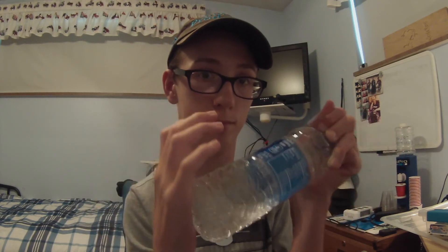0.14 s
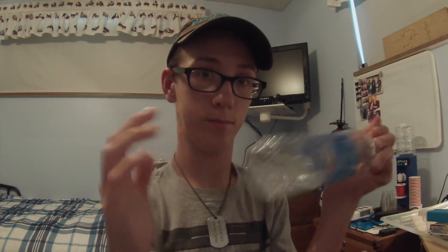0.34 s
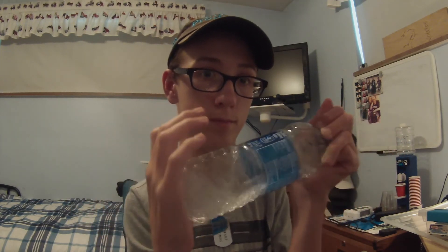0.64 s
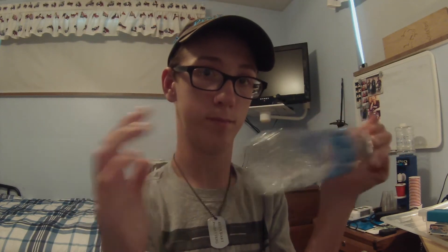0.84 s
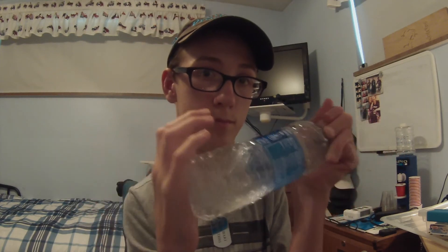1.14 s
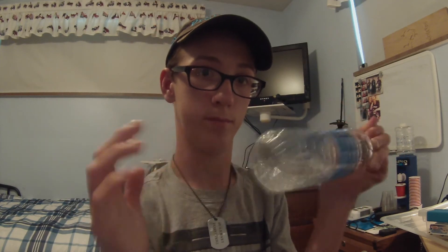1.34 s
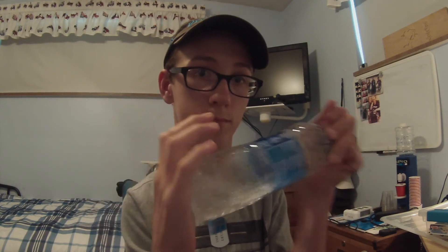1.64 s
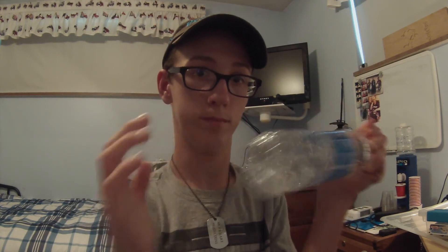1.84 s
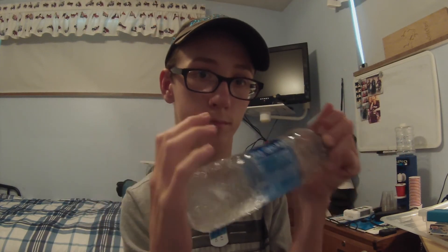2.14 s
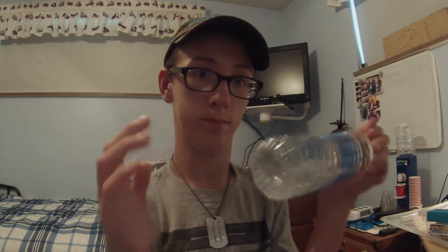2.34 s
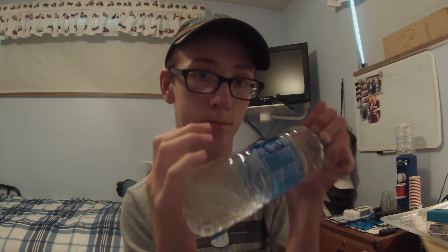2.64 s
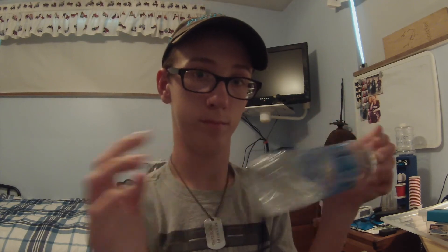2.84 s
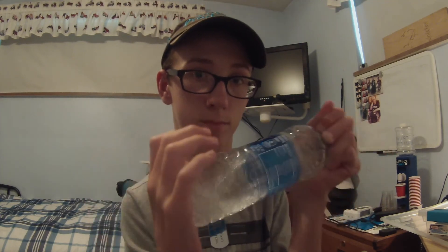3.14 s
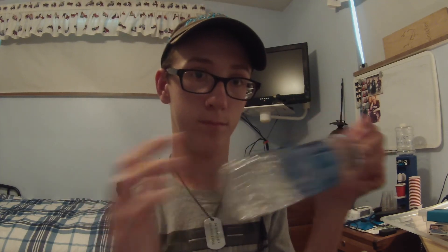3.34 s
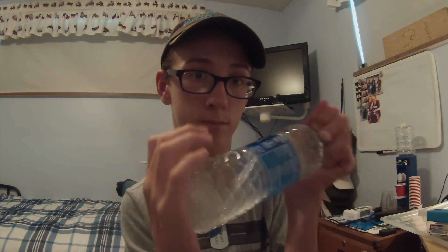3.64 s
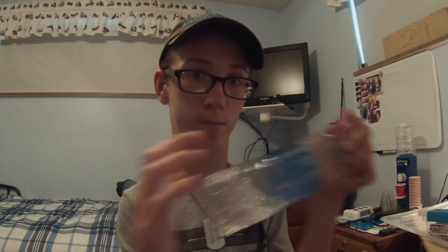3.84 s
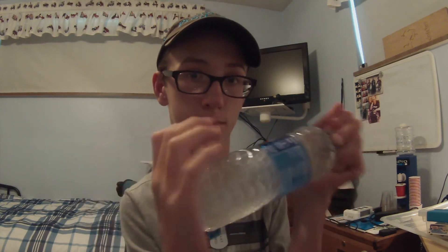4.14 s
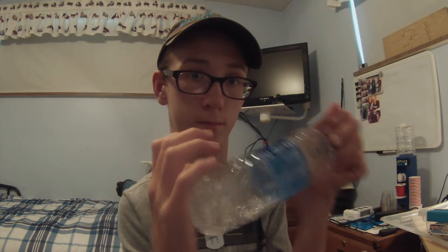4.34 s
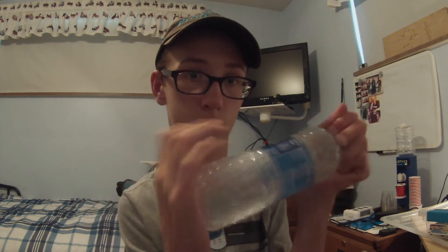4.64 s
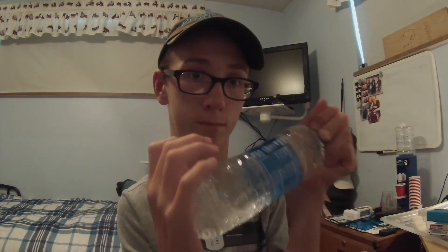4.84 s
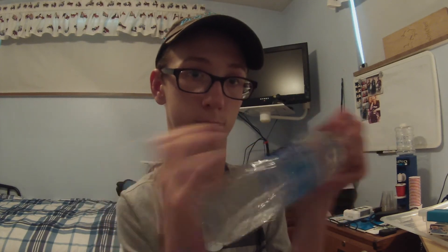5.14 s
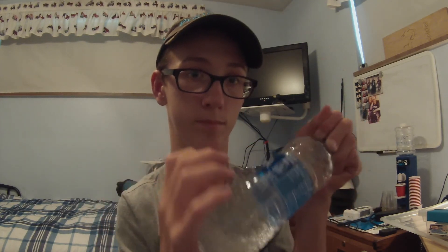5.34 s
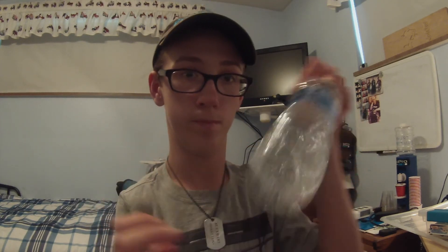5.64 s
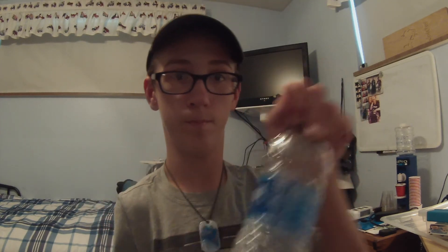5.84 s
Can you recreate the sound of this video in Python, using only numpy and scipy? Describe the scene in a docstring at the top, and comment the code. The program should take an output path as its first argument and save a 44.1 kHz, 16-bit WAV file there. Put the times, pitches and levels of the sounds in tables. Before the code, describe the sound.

A close microphone in a small, briefly echoing room picks up an empty thin plastic bottle squeezed by hand, over quiet air noise and a faint low hum. The sound starts in mid-squeeze at 0 s, then pops come near 0.5, 1.0, 1.5, 2.0, 2.5, 3.0, 3.6, 4.1, 4.7, 5.2 and 5.8 s. Each begins about a tenth of a second early with skidding fingertips and bright crinkling, then a crack and hollow thump with a short ring, then duller rustling as the wall springs back. Brief strained groans slip in just before some pops, around 0.5, 1.5, 3.5, 4.1 and 4.6 s. A particularly sharp crease snaps at 0.64 s, another strong one near 5.18 s. Thumps are fullest around 2.0, 4.1 and 4.7 s; the last squeeze is weaker, longer and crackly, with little thump.

```python
"""Hollow thumps, about two a second, break through the crackle of an empty thin plastic bottle squeezed and let go.
In each squeeze fingertips skid and rub (filtered noise and slips), then a wall panel pops (a crack, a pulse of
air and ringing modes). Grains of wrinkling film and a sliding hiss make the crinkle, duller as the wall springs
back; creases snap as ticks with short rings, and now and then the strained wall groans on a gliding tone.
A small room rings briefly over quiet air noise and a low hum."""
import sys
import numpy as np
from scipy import signal
from scipy.fft import rfft, irfft
from scipy.io import wavfile
from scipy.ndimage import uniform_filter1d

SR = 44100
rng = np.random.default_rng(int(sys.argv[2]) if len(sys.argv) > 2 else 0)


def generate_wav(sig):
    """Save sig (samples, or channels by samples) to the path in sys.argv[1] as 16-bit PCM at SR."""
    pcm = np.round(np.clip(np.atleast_2d(sig).T, -1, 1) * 32767).astype(np.int16)
    wavfile.write(sys.argv[1], SR, pcm)


N = 265041
TIME = np.arange(N) / SR
HIT = TIME[:4096]  # time axis of one short event (s)

# Modes of the wall and the air inside, nominal pitch and relative level: mode_hz [Hz], level_db [dB], t60_s [s]
WALL_MODES = [(141, -17.5, 0.064), (296.5, -4.5, 0.05), (377, -14.5, 0.094), (515.4, 2, 0.05),
              (695, -2.5, 0.02), (823, -0.5, 0.035), (1153, -10, 0.054)]
# One squeeze per row, timed by its pop; levels are relative, before each layer's trim: pop_s [s],
# grip_lead_s (grip before the pop) [s], grip_db (crinkle) [dB], collapse_db (crinkle) [dB], collapse_s (length) [s],
# recover_db (crinkle) [dB], buckle_s (time to buckle) [s], thump_db [dB], thump_hz [Hz],
# low_ring_db (low wall modes) [dB], upper_ring_db (upper wall modes) [dB]
SQUEEZE_COURSE = [(-.015, .1, -48, -41, .055, -57, 0.0023, -35, 229, -30, -30),
                  (0.5173, .085, -45.5, -41, .055, -55, 0.0026, -29, 255, -17, -24.5),
                  (1.0232, .083, -49, -42, .055, -58, 0.003, -29.5, 235, -15.5, -29.5),
                  (1.507, .105, -54.5, -39.5, .06, -55, .0027, -20.5, 295, -22.5, -22.5),
                  (1.975, .09, -53.5, -43, .028, -61, 0.0068, -17.5, 186, -54, -33),
                  (2.4987, .085, -50, -43.5, .052, -61, 0.0029, -29, 199, -19.5, -34),
                  (3.0444, .1, -51, -40, .04, -54, 0.0037, -23.5, 171, -47, -24),
                  (3.5751, .1, -47.5, -39.5, .047, -58.5, 0.0023, -26, 144, -35, -22),
                  (4.1277, .107, -48, -39.5, .05, -57, 0.00378, -13, 209.6, -17.5, -26.5),
                  (4.6545, .117, -49.5, -40.5, .05, -59, 0.0048, -14.5, 218.6, -16.5, -26.5),
                  (5.1986, .085, -53.5, -42.5, .028, -56.5, 0.0023, -21.5, 190.2, -41, -26.5),
                  (5.7975, .11, -62.5, -47, .1, -57, .0026, -40, 380, -25, -41)]


def undb(db):
    """Decibels to gain."""
    return 10 ** (np.asarray(db) / 20)


def unit(x):
    """Scale to rms 1."""
    return x / np.sqrt(np.mean(x ** 2))


def fade(t, t60):
    """Exponential decay by 60 dB in t60 seconds."""
    return np.exp(-np.log(1000) * t / t60)


def at(points, hz):
    """Read (Hz, value) points on a log-frequency axis."""
    f, value = np.transpose(points)
    return np.interp(np.log(np.maximum(hz, 1)), np.log(f), value)


def colour(x, points, size=2048):
    """Filter by a minimum-phase response of unit energy with the given (Hz, dB) spectrum."""
    spectrum_db = at(points, np.arange(size // 2 + 1) * SR / size)
    # folding the cepstrum onto positive time makes the filter causal
    cepstrum = irfft(np.log(undb(spectrum_db)))
    cepstrum[1:size // 2] *= 2
    cepstrum[size // 2 + 1:] = 0
    response = irfft(np.exp(rfft(cepstrum)))
    return signal.fftconvolve(x, response / np.linalg.norm(response))[:len(x)]


def add(track, s, sound):
    """Mix a sound in at time s, cut to the ends of the track."""
    i = int(s * SR)
    sound, i = sound[max(-i, 0):], max(i, 0)
    track[i:i + len(sound)] += sound[:max(N - i, 0)]


def background(air_db=-59.5, hum_db=-64, hum_hz=58, octave_db=-6):
    """Quiet room air as coloured noise, and a low hum with its octave, as of a distant motor."""
    # Spectrum of the room air, relative level: pitch_hz [Hz], level_db [dB]
    air_spectrum = [(12, -37), (20, -4), (76, -6), (282, -12.5), (342, -14.5), (491, -15), (881, -17.5),
                    (1100, -15), (1580, -21), (1720, -20.5), (4950, -25.5), (8400, -32), (15500, -46)]
    air = undb(air_db) * unit(colour(rng.standard_normal(N), air_spectrum))
    phase = 2 * np.pi * hum_hz * TIME
    hum = unit(np.sin(phase) + undb(octave_db) * np.sin(2 * phase))
    return air + undb(hum_db) * hum


def room(x, wet_db=-3, build_s=0.0024, size=22050):
    """Echoes of a small furnished room build up in a few milliseconds and die band by band."""
    # Decay of the room by frequency: band_hz [Hz], t60_s [s]
    band_t60 = [(100, 0.35), (500, 0.24), (2000, 0.26), (6000, 0.28), (14000, 0.25)]
    # Spectrum of the echoes, relative level: pitch_hz [Hz], level_db [dB]
    echo_spectrum = [(40, -6), (120, -4), (300, -4.5), (700, -2), (1500, -1), (3000, 0), (7000, -4),
                     (15000, 5.5)]
    t = TIME[:size]
    noise = rfft(rng.standard_normal(size))
    octave = np.round(np.log2(np.maximum(np.arange(len(noise)) * SR / size, 64)))
    tail = np.zeros(size)
    for k in np.unique(octave):
        band = irfft(noise * (octave == k), size)
        tail += band * fade(t, at(band_t60, 2 ** k))
    build_up = 1 - np.exp(-(t / build_s) ** 2)
    tail = colour(tail * build_up, echo_spectrum)
    return x + undb(wet_db) * signal.fftconvolve(x, tail / np.linalg.norm(tail))[:N]


def swell(db, start, end, rise_db_per_s, fall_db_per_s):
    """Power of a level that rises until start, holds and falls after end."""
    rise_db = rise_db_per_s * np.maximum(start - TIME, 0)
    fall_db = fall_db_per_s * np.maximum(TIME - end, 0)
    return undb(db - rise_db - fall_db) ** 2


def hand():
    """Levels (dB) of flexing, rubbing and skidding as squeezes grip, collapse and recover; share of recovery."""
    close_s, close_rate = .02, 900.5  # fingers closing; rates in dB/s
    onset_s, collapse_rate, settle_rate = .014, 801, 210
    recover_s, recover_rate = .185, 180  # springing back as the fingers let go
    hold_db = -73  # film while the bottle is only held
    # the fingers rub hardest just after the pop
    rub_db, rub_hold_db, rub_lag_s, rub_rise, rub_fall = -37.5, -62, 0.0089, 308, 221
    # landing fingertips skid: level over the grip, lead before the fingers close
    skid_over_grip_db, skid_lead_s, skid_rate = 2, 0.01, 260
    press, spring, slide, skid = 0, undb(hold_db) ** 2, undb(rub_hold_db) ** 2, 1e-18
    for s, grip_s, grip_db, collapse_db, length_s, recover_db, *_ in SQUEEZE_COURSE:
        closed = s - grip_s + close_s
        landed = closed - skid_lead_s
        rubbed = s + rub_lag_s
        skid = skid + swell(grip_db + skid_over_grip_db, landed, landed, close_rate, skid_rate)
        press = press + swell(grip_db, closed, s, close_rate, settle_rate)
        press = press + swell(collapse_db, s + onset_s, s + length_s, collapse_rate, settle_rate)
        spring = spring + swell(recover_db, s + length_s, s + recover_s, collapse_rate, recover_rate)
        slide = slide + swell(rub_db, rubbed, rubbed, rub_rise, rub_fall)
    flex_db, slide_db, skid_db = 10 * np.log10([press + spring, slide, skid])
    return flex_db, slide_db, skid_db, spring / (press + spring)


def wall_ring(mode_db, buckle_s=0.00022, scatter=0.044):
    """The wall modes swell while a panel buckles, then ring out; denting detunes them a little."""
    hz, db, t60 = np.transpose(WALL_MODES)
    hz = hz * (1 + scatter * rng.standard_normal(len(hz)))
    t = HIT - buckle_s
    modes = -np.cos(2 * np.pi * hz[:, None] * t) * fade(np.maximum(t, 0), t60[:, None])
    return undb(db + mode_db) @ modes * np.minimum(HIT / buckle_s, 1)


def rub(rub_db, slip_rate=700, ring_db=-6):
    """Fingertips slip in small jerks, drum softly on the wall and keep its modes ringing."""
    # Spectrum of the slips on the skin of the bottle, relative level: pitch_hz [Hz], level_db [dB]
    slip_spectrum = [(40, -7), (90, -3), (170, -1), (300, -1.5), (520, -2.5), (850, -7.5), (1400, -5),
                     (2500, -10.5), (6000, -24.5)]
    jerks = (rng.random(N) < slip_rate / SR) * rng.standard_normal(N)  # slip_rate per second
    slips = unit(jerks) * undb(rub_db)
    ring = wall_ring(mode_db=0)
    ringing = signal.fftconvolve(slips, ring / np.linalg.norm(ring))[:N]
    return colour(slips, slip_spectrum) - undb(ring_db) * ringing


def rustle(slide_db, flicker_db=6.0, size=180):
    """Skin and label slide over the film with a soft, uneven hiss."""
    flicker = unit(uniform_filter1d(rng.standard_normal(N), size))
    return unit(rng.standard_normal(N) * undb(flicker_db * flicker)) * undb(slide_db)


def fingers(rub_db, skid_db, rub_trim_db=-6):
    """Fingertips rub on the wall and skid over the film as they land."""
    # Spectrum of the skid, relative level: pitch_hz [Hz], level_db [dB]
    skid_spectrum = [(1500, -8), (3500, 6), (6500, -1), (9000, -3), (12000, -21), (15500, -20)]
    return undb(rub_trim_db) * rub(rub_db) + colour(rustle(skid_db), skid_spectrum)


def groans(waver=0.26, size=90):
    """The strained wall hums briefly with an unsteady, gliding pitch just before it gives."""
    # Groans of the wall: start_s [s], length_s [s], start_hz [Hz], end_hz [Hz], level_db (peak) [dB]
    glides = [(0.479, 0.023, 450, 380, -40), (1.466, 0.034, 474.3, 383, -39), (3.534, 0.048, 298, 503, -39),
              (4.079, 0.034, 480, 433, -39), (4.622, 0.032, 353, 429.7, -44)]
    out = np.zeros(N)
    for s, length, start_hz, end_hz, db in glides:
        progress = np.minimum(HIT / length, 1)
        wobble = unit(uniform_filter1d(rng.standard_normal(len(HIT)), size))
        hz = (start_hz + (end_hz - start_hz) * progress) * (1 + waver * wobble)
        envelope = np.sqrt(np.abs(np.sin(np.pi * progress)))
        add(out, s, undb(db) * np.sin(2 * np.pi * np.cumsum(hz) / SR) * envelope)
    return out


def crinkle(flex_db, size_db=5.0, cycles=19, tick=0.87, size=384):
    """Countless wrinkles flip, each with its own size and pitch; harder flexing flips more of them."""
    per_second = 2600 * undb(.4 * (flex_db - flex_db.max()))
    starts = np.flatnonzero(rng.random(N) < per_second / SR)
    chance = rng.random((len(starts), 2))
    hz = 700 + 14000 * chance[:, :1] ** 1.4
    t = TIME[:size]
    # each grain is a decaying tone plus a noise tick
    grains = np.sin(2 * np.pi * hz * t) * fade(t, cycles / hz)
    grains = grains + tick * rng.standard_normal(grains.shape) * fade(t, t60=0.0037)
    # most flips are tiny, a few stand out
    rank = np.minimum(-np.log(1 - chance[:, 1]), 3)
    # rarer flips are each stronger, so the overall level follows flex_db
    strength = unit(undb(size_db * rank)) * np.sqrt(SR / per_second[starts]) * undb(flex_db[starts])
    grains = grains * (strength / np.linalg.norm(grains, axis=1))[:, None]
    return np.bincount((starts[:, None] + np.arange(size)).ravel(), grains.ravel(), N)[:N]


def slacken(film, slack, dull_hz=4500):
    """Film that springs back is slack and sounds duller than film under pressure."""
    dull = signal.lfilter(*signal.butter(1, dull_hz, fs=SR), film)
    return film + slack * (dull - film)


def flexing_film(flex_db, slack, crinkle_db=-1.0, rustle_db=-3.0, contrast=1.12):
    """Flipping wrinkles and sliding hiss share the colour of the film and dull as it slackens."""
    # Spectrum of the film, relative level: pitch_hz [Hz], level_db [dB]
    film_spectrum = [(200, -13.5), (700, -7.5), (1400, -2.5), (2300, 0.5), (3500, 3), (5000, 1.5),
                     (7000, 1), (9000, -5), (12000, -11), (15500, -27)]
    # wrinkles stop flipping sooner than the sliding hiss fades
    flip_db = flex_db.max() + contrast * (flex_db - flex_db.max())
    film = undb(crinkle_db) * crinkle(flip_db) + undb(rustle_db) * rustle(flex_db)
    return slacken(colour(film, film_spectrum), slack)


def crack(envelope):
    """A burst of tiny slips in stiff film, rms 1 where the envelope is 1."""
    # Spectrum of a crack, relative level: pitch_hz [Hz], level_db [dB]
    crack_spectrum = [(150, -17), (500, -5), (900, 1), (1500, -3.5), (2500, 3.5), (4000, -1.5), (7000, -8),
                      (11000, -17.5), (15000, -35)]
    burst = colour(rng.standard_normal(len(HIT)) * envelope, crack_spectrum)
    return burst * np.linalg.norm(envelope) / np.linalg.norm(burst)


def random_creases(flex_db, tick_db=-43, facet_db=-44, nudge_db=-55, facet_hz=2900, octaves=0.51,
                   scatter_db=3, follow=0.21, busy_db=-55, count=64):
    """More creases snap at random: more often up to a flexing of busy_db, louder the harder the film flexes."""
    chance = rng.random(count)
    tick, facet, pitch = np.clip(rng.standard_normal((count, 3)).T, -2, 2)
    # equal shares of accumulated strain set the times
    strain = np.cumsum(undb(np.minimum(flex_db, busy_db)) ** 2)
    s = np.interp((np.arange(count) + chance) / count, strain / strain[-1], TIME)
    force_db = follow * (np.interp(s, TIME, flex_db) - busy_db)
    ticks_db = tick_db + force_db + scatter_db * tick
    facets_db = facet_db + force_db + scatter_db * facet
    return list(zip(s, ticks_db, facet_hz * 2 ** (octaves * pitch), facets_db, nudge_db + force_db))


def creases(flex_db, tick_trim_db=-1.0, tick_t60=0.02, tear_s=0.00039, facet_t60=.013, spread=0.1,
            wall_trim_db=-7, rise_s=.0001, count=4):
    """A crease snaps: a tick, a cluster of short modes of the facet beside it, and a nudge to the wall."""
    # Single creases with set times, loud and faint; nominal pitch, levels before trims: start_s [s],
    # tick_db [dB], facet_hz [Hz], facet_ring_db [dB], wall_ring_db [dB]
    placed_creases = [(.187, -45, 1510, -47, -40.5), (0.46, -32.5, 3140, -32, -42),
                      (.6041, -41, 1180, -34, -49), (0.6352, -17, 2200, -14.5, -43),
                      (0.7557, -51, 2360, -35.5, -54), (0.9697, -32.5, 1290, -39, -61),
                      (1.009, -32.5, 1420, -27, -53), (1.0241, -38, 3120, -19.5, -60),
                      (1.064, -39, 4530, -31, -36), (1.2028, -45, 3540, -45, -50),
                      (1.468, -30, 2900, -31, -59), (1.6036, -29, 2350, -52, -50),
                      (1.8711, -37, 3930, -34.5, -59), (1.914, -35, 3370, -30.5, -67),
                      (1.9432, -27, 3480, -31, -50), (1.952, -23, 1124, -27.5, -28.5),
                      (2.0435, -29, 3330, -39, -62), (2.425, -32.5, 3170, -33, -64),
                      (2.4413, -31, 1300, -26, -48), (2.443, -35, 2380, -28, -47),
                      (2.671, -40.5, 3530, -63, -48.5), (2.9485, -47, 3950, -39.5, -60),
                      (3.0049, -29, 2203, -27, -31.5), (3.011, -27.5, 1445, -28, -31.5),
                      (3.2314, -36, 5400, -38, -48), (3.4759, -36.5, 4050, -39, -60),
                      (3.5366, -33.5, 3517, -34, -40), (3.6113, -50, 2330, -23.5, -50),
                      (3.755, -37.5, 3180, -35, -64), (4.097, -29.5, 3165, -33, -35),
                      (4.257, -39, 1387, -32, -43), (4.292, -42, 1456, -31.5, -43.5),
                      (4.5724, -43, 3700, -30, -52), (4.637, -31, 1908, -25, -43),
                      (4.7006, -38, 3760, -30, -31.5), (4.807, -36, 3710, -37, -42.5),
                      (5.176, -34, 3310, -29, -46), (5.183, -22, 3000, -16.5, -28.5),
                      (5.3189, -35, 5184, -37, -46), (5.4167, -48, 2300, -37.5, -38),
                      (5.5577, -47, 3800, -35, -67), (5.7, -38, 2880, -37, -47),
                      (5.7711, -31, 1300, -26, -28), (5.891, -34, 1692, -28, -40),
                      (5.907, -41, 2732, -38, -33)]
    out = np.zeros(N)
    for s, click_db, hz, facet_db, nudge_db in placed_creases + random_creases(flex_db):
        detune = np.linspace(-1, 1, count) + rng.uniform(-0.051, 0.31, count)
        facet_hz = hz * np.exp(spread * detune)
        cycles = facet_hz[:, None] * HIT + rng.random((count, 1))
        facet = np.sin(2 * np.pi * cycles).sum(0) / np.sqrt(count)
        add(out, s, undb(facet_db) * facet * fade(HIT, facet_t60) * (1 - np.exp(-HIT / rise_s)))
        tick = crack(fade(HIT, tick_t60) * (1 - np.exp(-HIT / tear_s)))
        add(out, s, undb(click_db + tick_trim_db) * tick)
        add(out, s, wall_ring(nudge_db + wall_trim_db))
    return out


def pops(crack_db=12.5, crack_t60=0.033, ring_db=-4.5, shove_db=-3.0, sway_db=-20, sway_hz=55, sway_t60=0.052):
    """A panel rim cracks in step with the collapse level; the panel flips, shoves air, rings and jolts the bottle."""
    out = np.zeros(N)
    wall_hz = np.transpose(WALL_MODES)[0]
    for s, _, _, collapse_db, _, _, buckle_s, thump_db, thump_hz, low_db, upper_db in SQUEEZE_COURSE:
        rim = crack(fade(np.maximum(HIT - buckle_s / 2, 0), crack_t60))
        add(out, s, undb(collapse_db + crack_db) * rim)
        # the shove is one short pulse centred on the end of the buckling
        swing = (np.pi * thump_hz * (HIT - HIT.mean())) ** 2
        shove = (2 * swing - 1) * np.exp(-swing)
        add(out, s + buckle_s - HIT.mean(), undb(thump_db + shove_db) * shove)
        # where the panel sits decides which modes it drives
        mode_db = at([(300, low_db), (515, upper_db)], wall_hz)
        add(out, s, wall_ring(mode_db + ring_db, buckle_s))
        sway = np.sin(2 * np.pi * sway_hz * HIT) * fade(HIT, sway_t60)
        add(out, s + buckle_s, undb(thump_db + sway_db) * sway)
    return out


def scene():
    """The hand works the bottle in its room, over the background."""
    flex_db, rub_db, skid_db, slack = hand()
    bottle = fingers(rub_db, skid_db) + groans() + flexing_film(flex_db, slack) + creases(flex_db) + pops()
    return (room(bottle) + background())[None]


def record(dry, top_hz=15600):
    """A steep elliptic low-pass cuts the top."""
    return signal.sosfilt(signal.ellip(10, .2, 70, top_hz, fs=SR, output="sos"), dry)


dry = scene()
out = record(dry)
generate_wav(out)
```